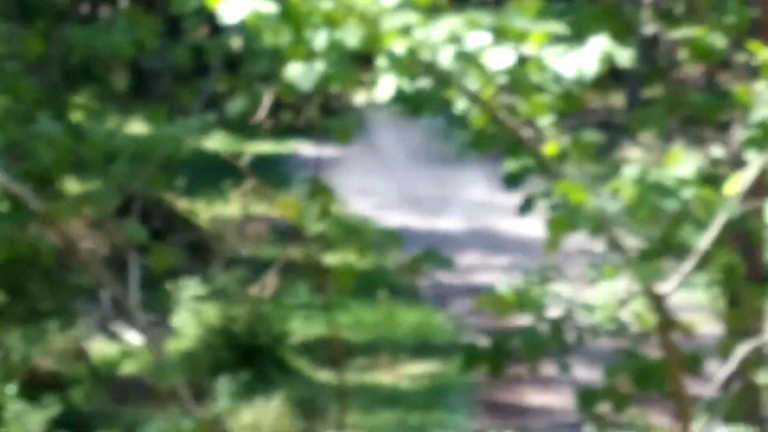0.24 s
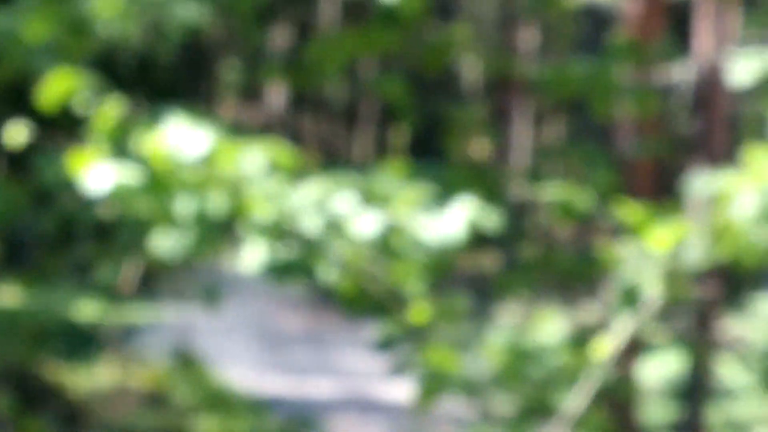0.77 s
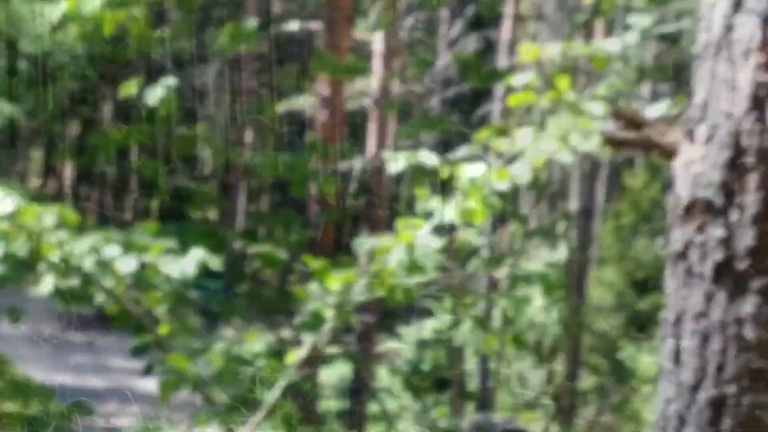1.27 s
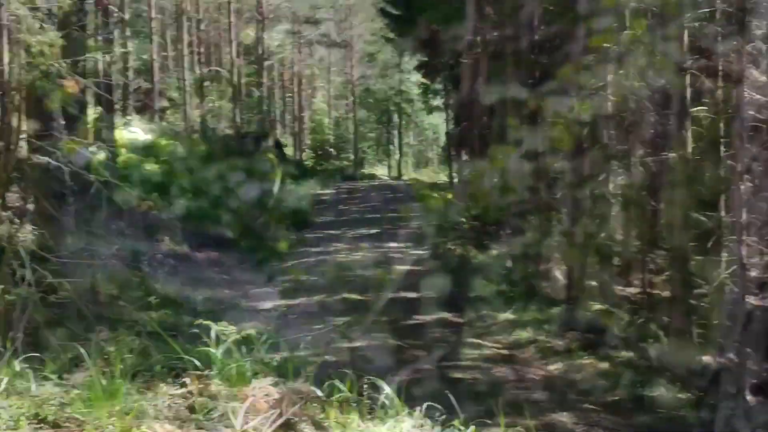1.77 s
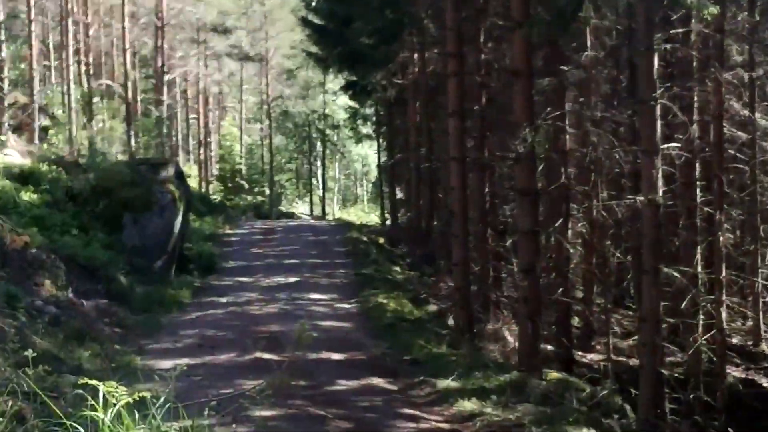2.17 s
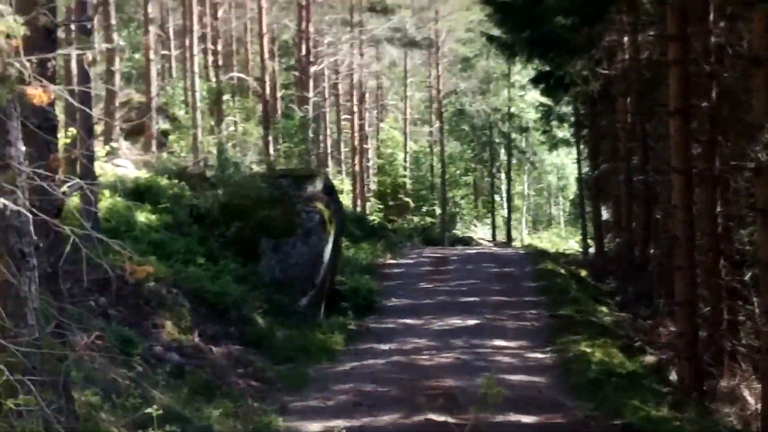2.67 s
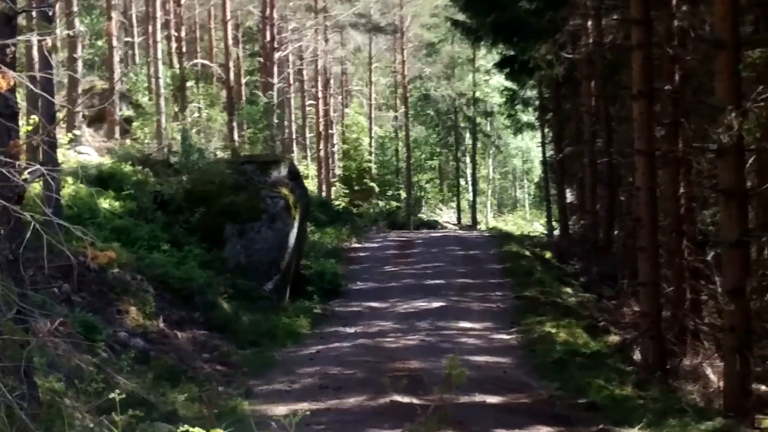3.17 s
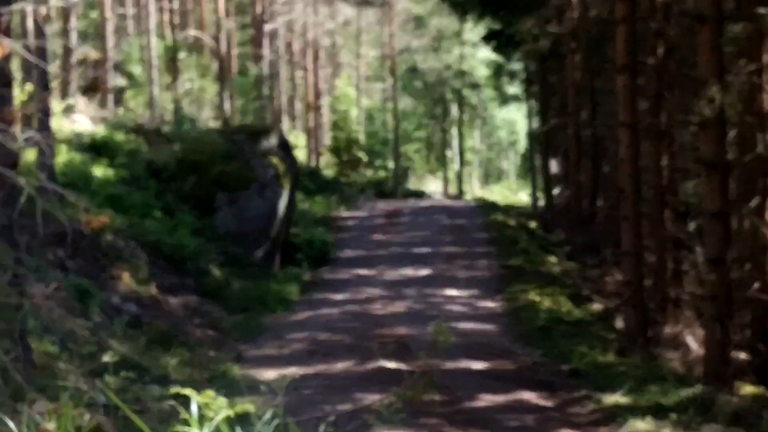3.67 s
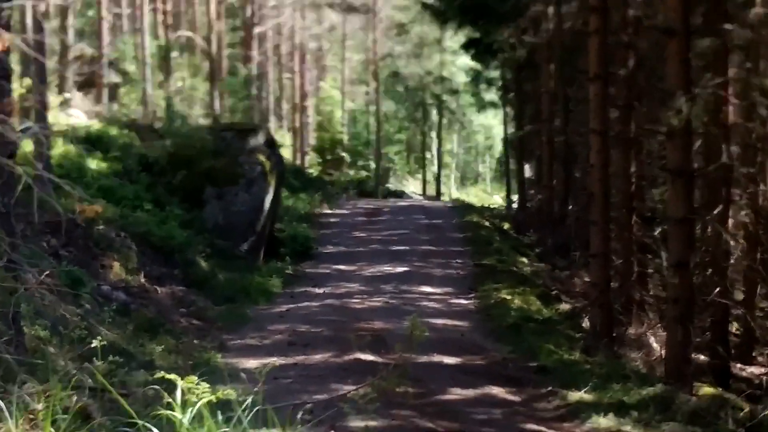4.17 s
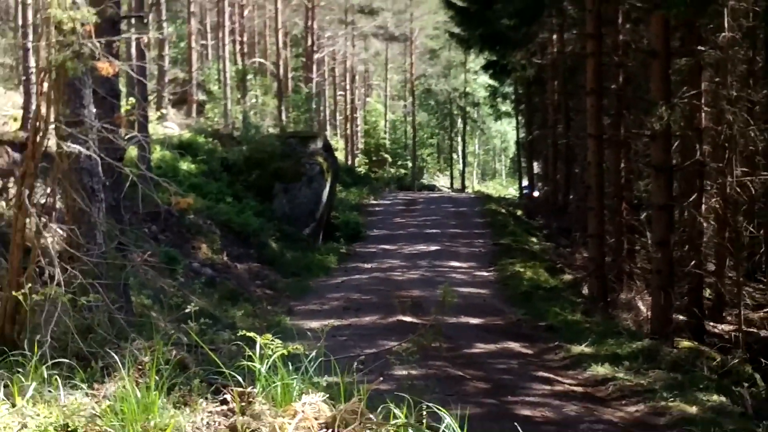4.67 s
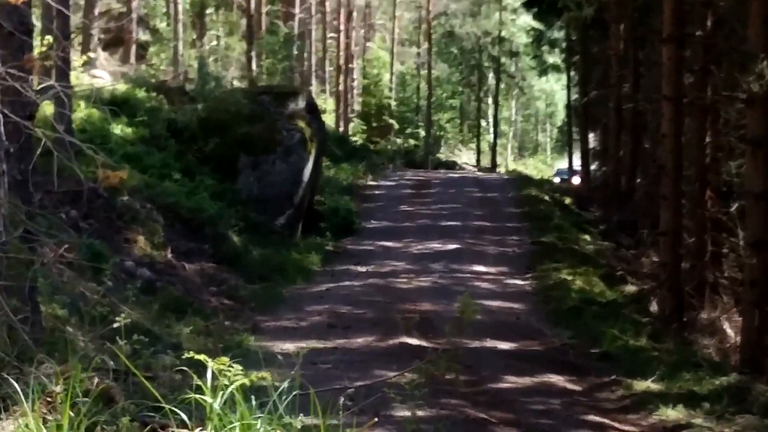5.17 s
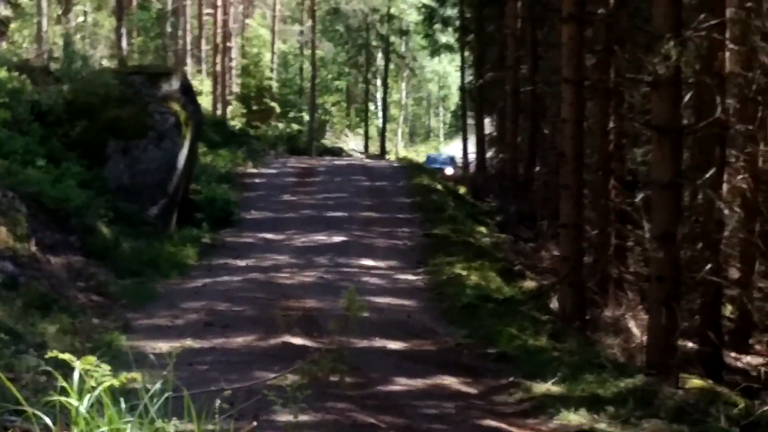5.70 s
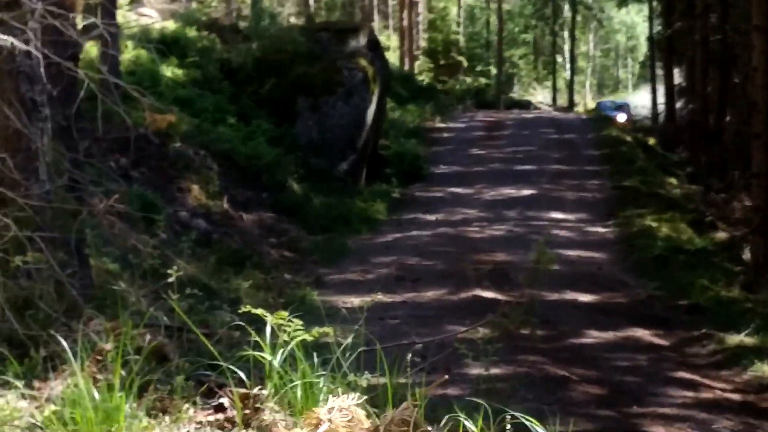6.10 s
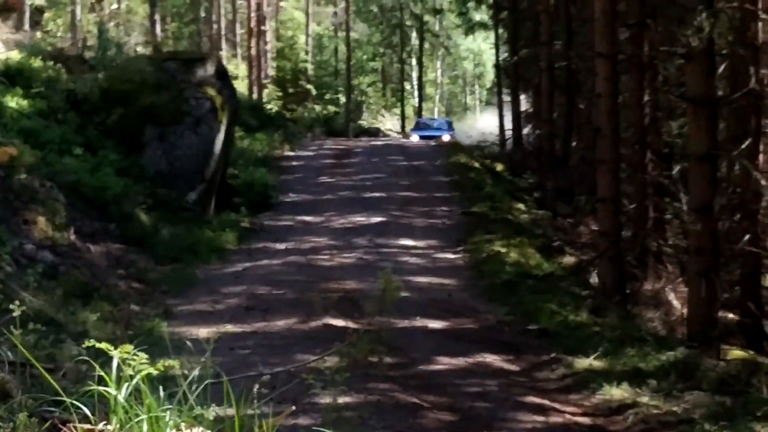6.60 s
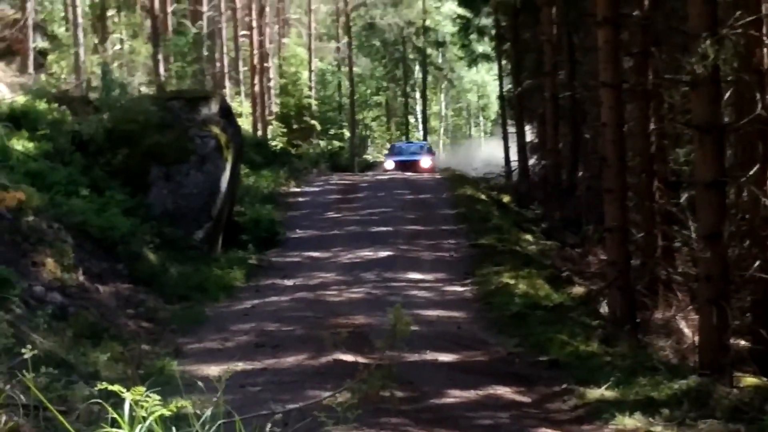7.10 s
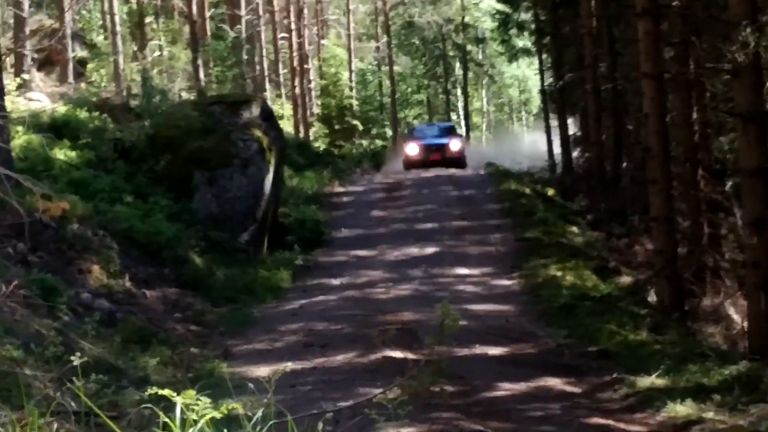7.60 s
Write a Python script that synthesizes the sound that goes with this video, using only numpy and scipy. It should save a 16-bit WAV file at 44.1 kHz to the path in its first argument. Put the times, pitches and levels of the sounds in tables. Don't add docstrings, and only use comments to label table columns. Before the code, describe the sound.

A rally car is already pulling away loudly at 0 s, its even exhaust note high and raspy, with small bright stone clacks. It lifts at about 0.25 s; a heavy bang at 0.4 s and a weak pop at 0.53 s follow as pitch sinks. A tight burst of bangs from 0.75 to 0.84 s peaks into limiting, then the next gear bites and the engine climbs until 1.9 s, fading with a short forest echo. A distant pop comes near 2.07 s. From 2.2 s a faint second engine drones, uneven and throbbing, rising to 4.1 s, easing, then pulling again at 4.6-5.4 s. Its pitch sinks until 6.9 s with a short throttle push. Twig ticks, rustles and dry snaps sound close by, with hard knocks at 5.9 and 6.96 s. From 7.2 s tyre hiss grows, and the engine surges at 7.5 s, still approaching at the end.

```python
import sys
import numpy as np
from scipy import signal
from scipy.io import wavfile
from scipy.ndimage import uniform_filter1d, minimum_filter1d

SR = 44100
rng = np.random.default_rng(int(sys.argv[2]) if len(sys.argv) > 2 else 0)


def file_out(sig):
    cols = np.atleast_2d(sig).T
    lim = np.clip(cols, -1, 1)
    pcm = np.round(lim * 32767).astype(np.int16)
    wavfile.write(sys.argv[1], SR, pcm)


def to_linear_factor(level_db):
    exponent = np.asarray(level_db, float) / 20
    return 10 ** exponent


N = 346185
TIME = np.arange(N) / SR


def evened(x):
    return x / np.sqrt(np.mean(x ** 2) + 1e-20)


def read(points, hz):
    f, value = np.transpose(points)
    return np.interp(np.log(hz + 1), np.log(f + 1), value, left=value[0], right=value[-1])


def controls(rows):
    s, *columns = np.transpose(rows)
    start_s = s[0] - .05 * (s[0] == 0)
    fade = np.clip(np.minimum(TIME - start_s, s[-1] + .05 - TIME) / .05, 0, 1)
    return [fade] + [np.interp(TIME, s, c) for c in columns]


def pulls(rows, shut_db, edge_s):
    out = np.outer(shut_db, np.ones(N))
    for start_s, end_s, *open_db in rows:
        opened = np.clip(np.minimum(TIME - start_s, end_s - TIME) / edge_s + .5, 0, 1)
        out += np.outer(np.subtract(open_db, shut_db), opened)
    return out


def drift(rate_hz, t):
    knots = rng.standard_normal(1000)
    return np.interp(t * rate_hz, np.arange(len(knots)), knots) * 1.2


def noise(colour, patchy_db, bright=0, pivot_hz=1000):
    frames, hz = N // 256 + 5, np.fft.rfftfreq(1024, 1 / SR)[:, None]
    a, b, patches = rng.standard_normal((frames, 513, 3)).T
    patches = uniform_filter1d(patches, size=8, axis=0)
    patches = evened(uniform_filter1d(patches, size=12, axis=1))
    shape = to_linear_factor(read(colour, hz))
    norm = np.sqrt(np.sum(shape ** 2) * 2 / 1.5) * 2
    tilt = np.interp(np.arange(frames) * 256, np.arange(N), bright * np.ones(N))
    octaves = np.log2(np.maximum(hz, pivot_hz / 2) / pivot_hz)
    z = shape * (a + 1j * b) * to_linear_factor(patchy_db * patches + tilt * octaves)
    return signal.istft(z, nperseg=1024, noverlap=768)[1][:N] / norm


def partials(turns, levels_db, live, waver_db, blur, rate_hz, spread):
    out, t = np.zeros(N), TIME[live]
    for k, db in levels_db.items():
        phase = k * turns[live] + spread * rng.random() + blur * k * drift(rate_hz, t)
        level = to_linear_factor(db[live] + waver_db * np.sqrt(k) * drift(rate_hz, t))
        out[live] += level * np.sqrt(2) * np.cos(2 * np.pi * phase)
    return out


def puffs(turns, depth):
    return evened(np.exp(depth * np.cos(2 * np.pi * turns)))


# (frequency [Hz], width [Hz], level [dB])
SILENCER_MODES = [(240, 110, 14.5), (460.7, 29, 4.5), (511.7, 40.4, 11.5), (685, 120, 2), (1034, 120, 4.5),
                  (1224, 170, -0.5)]


def silencer(hz):
    power = sum(to_linear_factor(2 * db) / (1 + (2 * (hz - f) / width) ** 2) ** 2 for f, width, db in SILENCER_MODES)
    return 10 * np.log10(power)


# (time [s], firing rate [Hz])
LEAVING_REVS = [(0, 229.6), (.23, 236.9), (.36, 221.8), (.5, 218.5), (.62, 201.5), (.74, 172), (.86, 184.3),
                (.92, 207.7), (1.0, 231.4), (1.13, 239.5), (1.21, 247.8), (1.47, 254.6), (1.64, 261.6),
                (1.81, 272.4), (1.89, 265), (2.0, 242.5), (2.2, 232.2)]
# (time [s], level [dB])
LEAVING_FLOW = [(0, -23.5), (.23, -25.5), (.29, -31), (.395, -31.5), (.44, -26.5), (.5, -24.5), (.62, -30),
                (.74, -29.5), (.86, -23), (.92, -19.5), (1.13, -20), (1.35, -23), (1.47, -30.5),
                (1.83, -33), (1.92, -44.5), (2.02, -57), (2.07, -44), (2.2, -50)]
# (from [s], to [s], firing order [dB], low orders [dB], high orders [dB])
LEAVING_PULLS = [
    (-.1, .24, -0.4, 2, -10),
    (.86, 1.0, 0, -3, -6),
    (1.0, 1.4, -1, -2, 1.5),
    (1.4, 1.89, 1.5, 3, 5),
    (2.05, 2.12, -4, -3, -25),
]
# (frequency [Hz], level [dB])
LEAVING_PIPE = [(1100, -16.5), (1500, -22), (1750, -34), (2000, -12.5), (2300, -22), (2600, -26.5),
                (3000, -37.5), (3500, -52.5)]
# (frequency [Hz], density [dB per Hz])
LEAVING_ROAR = [(25, -42), (60, -21), (130, -18.5), (240, -8), (350, -12), (700, -15), (1500, -17),
                (2100, -19.5), (3000, -31), (3700, -40.5), (4500, -48.5), (7000, -62), (10000, -69.5),
                (12500, -86.5)]


def leaving_car():
    fade, hz = controls(LEAVING_REVS)
    flow_db = controls(LEAVING_FLOW)[1]
    shut_db = (-9, -13.5, -22)
    firing_db, low_db, high_db = pulls(LEAVING_PULLS, shut_db, edge_s=0.025)
    shut = np.clip(low_db / shut_db[1], 0, 1)
    turns = np.cumsum(uniform_filter1d(hz, size=1500)) / SR
    high_db = flow_db + 10.5 + high_db
    levels = {k: flow_db + low_db + silencer(k * hz) for k in range(2, 6)}
    levels[1] = flow_db + firing_db + silencer(hz)
    levels.update({k: high_db + read(LEAVING_PIPE, k * hz) for k in range(6, 16)})
    levels.update({k + .5: high_db - 37.5 for k in range(10)})
    tone = partials(turns, levels, fade > 0, waver_db=1.0, blur=0.015, rate_hz=30.0, spread=1.0)
    roar = noise(LEAVING_ROAR, 2.53, bright=1.2 * shut, pivot_hz=2200) * puffs(turns, 0.068)
    return fade * (tone + to_linear_factor(flow_db + 10.5) * roar)


# (frequency [Hz], t60 [s])
FOREST_T60 = [(100, 0.81), (500, 0.91), (2000, 1), (6000, 0.27)]


def forest(x):
    taps = np.zeros(SR)
    at = np.arange(900, SR - 20, 20)
    taps[at + rng.integers(0, 20, len(at))] = rng.choice([-1., 1.], len(at))
    hz, t, z = signal.stft(taps, SR, nperseg=256)
    t60_s = np.maximum(read(FOREST_T60, hz), .05)[:, None]
    tail = signal.istft(z * to_linear_factor(-60 * t / t60_s), SR, nperseg=256)[1]
    return signal.fftconvolve(x, tail / np.linalg.norm(tail))[:N]


# (frequency [Hz], density [dB per Hz])
AIR_COLOUR = [(3600, -5), (4300, -11.5), (5200, -14), (6500, -10.5), (8000, -24.5), (10000, -15.5),
              (12500, -22.5), (15000, -19.5)]


def still_air():
    return to_linear_factor(-62.5) * noise([(2500, -64.0)] + AIR_COLOUR, .8)


def hits(rows):
    out, t = np.zeros(N + SR), np.arange(3500) / SR
    for s, db, hz, width_hz, t60_s in rows:
        burst = rng.standard_normal(len(t)) * (to_linear_factor(-60 * t / t60_s) + .08 * to_linear_factor(-60 * t / .04))
        burst *= 1 - np.exp(-t / t60_s / .15)
        edges_hz = np.clip([hz - width_hz / 2, hz + width_hz / 2], 500, 16000)
        hit = signal.sosfilt(signal.butter(2, edges_hz, "bandpass", fs=SR, output="sos"), burst)
        out[round(s * SR):][:len(t)] += to_linear_factor(db - 1.5) * hit / abs(hit).max()
    return out[:N]


# (time [s], peak [dB], centre [Hz])
STONES = [(0.1186, -38.5, 11160), (0.1263, -48, 10000), (0.3247, -51, 8710), (0.5801, -55, 9570),
          (1.1423, -33.5, 9952), (1.1537, -48.5, 8000), (1.1677, -42.5, 9030), (1.2341, -54, 8045),
          (1.2994, -50.5, 9530), (1.5364, -55, 9500)]


def stones():
    return hits([(s, db, hz, 2200, 0.014) for s, db, hz in STONES])


# (time [s], peak [dB], pipe ring [Hz], upper ring [Hz], crack [dB])
BANGS = [
    (0.408, 10.5, 246, 393, -7.5),
    (0.527, -8, 227, 454, -1.5),
    (0.749, 7.5, 197, 498, -4),
    (0.763, 12.5, 214, 467, -12),
    (0.774, 6.5, 199, 419.5, -4.5),
    (0.808, -6.5, 187.7, 504, -3.5),
    (0.839, 4, 202, 563, 0),
    (2.066, -26, 240, 509.4, -24),
]


def backfires():
    out, t = np.zeros(N + SR), np.arange(SR // 5) / SR
    crack = noise(LEAVING_ROAR, 1.5)
    envelope = (1 - np.exp(-t / 0.0014)) ** 2 * to_linear_factor(-60 * t / 0.048)
    envelope /= envelope.max()
    for s, db, hz, upper_hz, crack_db in BANGS:
        at = round(s * SR)
        ring = np.sin(2 * np.pi * hz * t) + 0.48 * np.sin(2 * np.pi * upper_hz * t)
        thump = to_linear_factor(-18.5) * np.sin(2 * np.pi * 72 * t)
        bang = ring + thump + to_linear_factor(crack_db) * crack[at:at + len(t)]
        out[at:at + len(t)] += to_linear_factor(db) * envelope * bang
    return out[:N]


# (time [s], peak [dB], centre [Hz], width [Hz], t60 [s])
KNOCKS = [
    (.637, -39, 4950, 895, .03),
    (4.93, -41, 5130, 2202, 0.032),
    (5.905, -25.5, 2987, 2960, 0.007),
    (6.96, -20, 1900, 2700, 0.0043),
    (6.961, -49, 4000, 497.5, 0.033),
]


def knocks():
    return hits(KNOCKS)


# (time [s], hiss level [dB])
NEARNESS = [(1.8, -74), (3.7, -72), (4.55, -67.5), (5.78, -62), (6.99, -62), (7.25, -54.5), (7.55, -49.5),
            (7.85, -48)]
# (frequency [Hz], density [dB per Hz])
RUMBLE = [(8.8, -47.5), (15, -16), (22, -32), (56, -9), (96, 16.5), (130, -16), (170, -26.5), (290, -120)]
# (frequency [Hz], density [dB per Hz])
HISS = [(3000, -6.5), (3700, 2), (4500, 4), (5300, 2.5), (6300, -5.5), (7500, -10.5), (9200, -11),
        (9800, -23), (11000, -33), (14000, -39.5)]


def tyres():
    fade, hiss_db = controls(NEARNESS)
    rumble_db = np.minimum(-65.5 + 1.4 * (hiss_db - hiss_db[0]), -38.5)
    rumble = to_linear_factor(rumble_db + 9.0) * noise(RUMBLE + [(200, -75)], 2.2)
    hiss = to_linear_factor(hiss_db + 7.5) * noise([(2200, -70)] + HISS, 2.2)
    return fade * (rumble + hiss)


# (frequency [Hz], width [Hz], ring [dB])
NEARING_PIPE = [(734, 135, 2.5), (1134, 107, 1.5), (1579, 140, 3)]


def pipe(x):
    out = x
    for hz, width_hz, db in NEARING_PIPE:
        out = out + to_linear_factor(db) * signal.lfilter(*signal.iirpeak(hz, hz / width_hz, fs=SR), x)
    return out


# (time [s], cycle rate [Hz])
NEARING_REVS = [(1.95, 52.2), (2.4, 53.25), (3.15, 57.27), (3.85, 57.57), (4.12, 61.79), (4.24, 59.16),
                (4.43, 51.37), (4.8, 47.7), (4.97, 48.71), (5.17, 53.12), (5.4, 47.5), (5.8, 41.64),
                (6.0, 32.99), (6.33, 35.2), (6.92, 26.73), (7.15, 33.55), (7.53, 38.87), (7.85, 34.3)]
# (time [s], level [dB])
NEARING_FLOW = [(1.95, -53.5), (2.2, -48.5), (2.69, -42), (4.2, -40.5), (4.33, -46), (4.63, -44),
                (4.97, -36.5), (5.5, -37.5), (5.56, -39), (5.8, -40.5), (6.45, -43.5), (6.7, -44.5),
                (6.75, -40), (7.36, -41), (7.46, -36.5), (7.54, -27.5), (7.68, -33.5), (7.85, -32.5)]
# (from [s], to [s], firing order [dB], uneven orders [dB], doubled firing [dB])
NEARING_PULLS = [
    (2.22, 4.22, 4, 0.1, -5),
    (4.56, 5.45, 0, -3, -10),
    (6.72, 7.08, 6.5, -8, -12),
    (7.46, 7.95, -7, -28, -3.5),
]
# (time [s], change [dB])
BUMPS = [(2.26, 2), (2.97, -2), (3.14, -2), (3.52, -3.5), (3.8, -3.5), (5.19, -1.5), (5.6, -2.5),
         (5.82, 3.5), (6.25, -2), (7.05, 0.5)]
# (multiple of the cycle, level [dB])
NEARING_ORDERS = [(1, -29.5), (2, -29.5), (3, -8.5), (4, 0), (5, -2.5), (6, -55), (7, -14), (8, -9),
                  (9, -13.5)]
# (frequency [Hz], density [dB per Hz])
NEARING_ROAR = [(60, -42), (100, -23), (170, -5), (420, -5.5), (720, -7.5), (930, -12), (1150, -13.5),
                (1350, -16), (1600, -16.5), (1850, -16), (2400, -14.5), (3000, -21), (3700, -30.5),
                (5500, -50.5)]


def nearing_car():
    fade, hz = controls(NEARING_REVS)
    bump_s = 0.034
    sag_db = sum(db * np.exp(-((TIME - s) / bump_s) ** 2) for s, db in BUMPS)
    flow_db = controls(NEARING_FLOW)[1] + sag_db
    coast_db = (-2.5, -8, -9.5)
    firing_db, uneven_db, double_db = flow_db + sag_db + pulls(NEARING_PULLS, coast_db, edge_s=0.037)
    bright = 3.55 * np.log2(hz / 50.2) - 0.0448 * (flow_db + 40.5)
    turns = np.cumsum(uniform_filter1d(hz, size=4000)) / SR
    lesser_db = uneven_db + 2.65
    levels = {k: lesser_db + db for k, db in NEARING_ORDERS}
    levels.update({k: lesser_db - 10.5 + read(NEARING_ROAR, k * hz) for k in range(10, 31)})
    levels.update({4: firing_db, 5: uneven_db, 8: double_db})
    tone = partials(turns, levels, fade > 0, waver_db=1.2, blur=.011, rate_hz=11, spread=.18)
    roar = noise(NEARING_ROAR + [(8000, -67)], 0.77, bright, pivot_hz=900) * puffs(turns - .05, 0.083)
    return fade * pipe(tone + to_linear_factor(flow_db + 11.5) * roar)


# (time [s], peak [dB], centre [Hz])
TICKS = [
    (2.2847, -50, 3900),
    (2.3207, -32.5, 3422),
    (3.0934, -57, 3761),
    (3.264, -39, 3380),
]


def twig_ticks():
    return hits([(s, db, hz, 1100, .018) for s, db, hz in TICKS])


# (time [s], peak [dB])
RUSTLES = [(3.1403, -64), (3.6794, -67), (4.9307, -56), (5.2135, -62), (5.2694, -64), (5.5494, -69),
           (6.1494, -56), (6.4792, -60), (6.5994, -57), (6.6494, -61)]


def rustles():
    return hits([(s, db, 9320, 3100, 0.092) for s, db in RUSTLES])


# (time [s], peak [dB])
SNAPS = [(3.264, -50), (3.7994, -50.5), (4.3794, -49.5), (4.5314, -44), (4.93, -43), (5.9055, -44),
         (5.9394, -39.5), (6.1794, -50), (6.4088, -50.5), (6.7594, -49), (6.9306, -43.5), (6.9582, -36.5)]


def snaps():
    return hits([(s, db, 5300, 9500, 0.007) for s, db in SNAPS])


def scene():
    leaving = leaving_car() + backfires()
    nearing = tyres() + nearing_car()
    small = stones() + knocks() + twig_ticks() + rustles() + snaps()
    return (leaving + to_linear_factor(-20.0) * forest(leaving) + nearing + small + still_air())[None]


def low_pass(x):
    return signal.sosfilt(signal.butter(12, 15830, fs=SR, output="sos"), x)


def record(dry):
    room = np.minimum(.97 / (abs(dry) + 1e-9), 1)
    gain = uniform_filter1d(minimum_filter1d(room, size=301), size=301)
    return low_pass(dry * gain)


dry = scene()
out = record(dry)
file_out(out)
```